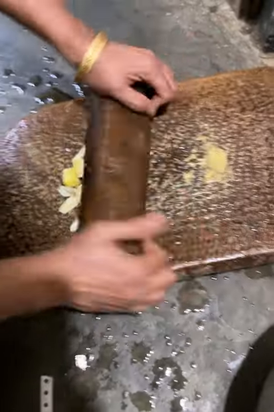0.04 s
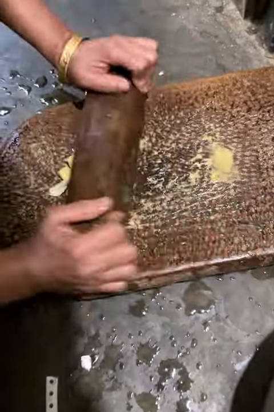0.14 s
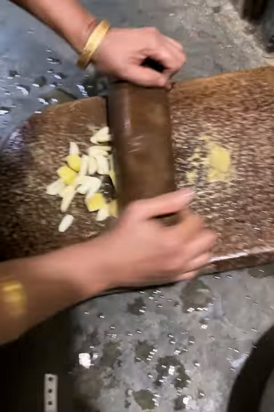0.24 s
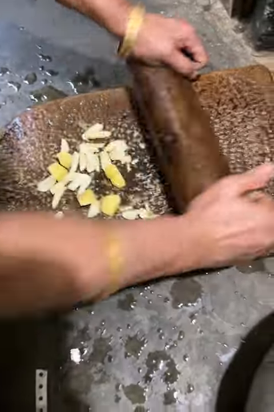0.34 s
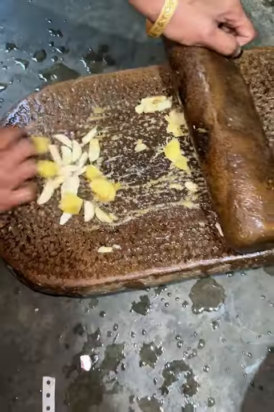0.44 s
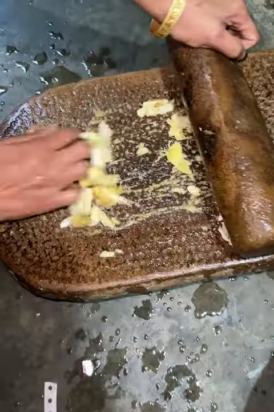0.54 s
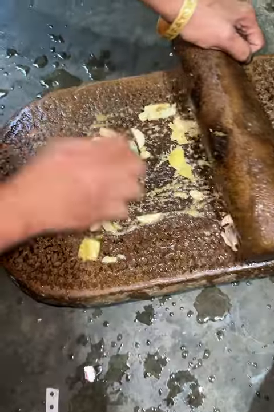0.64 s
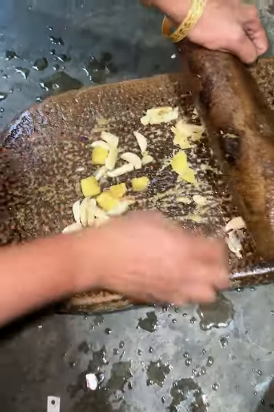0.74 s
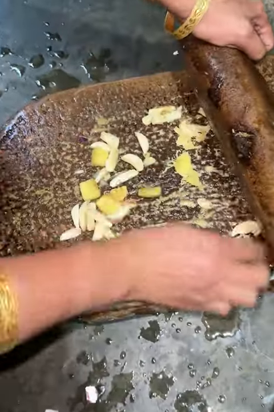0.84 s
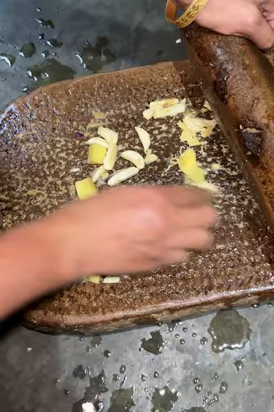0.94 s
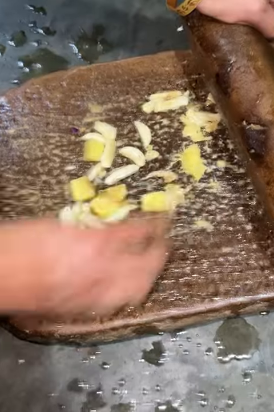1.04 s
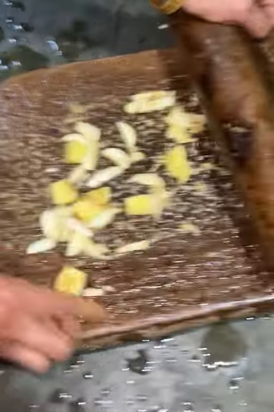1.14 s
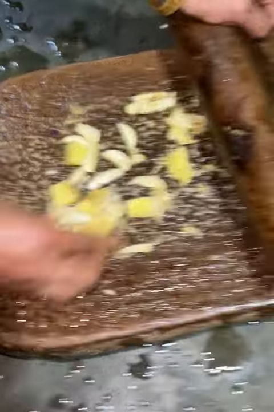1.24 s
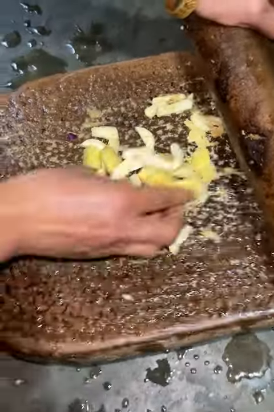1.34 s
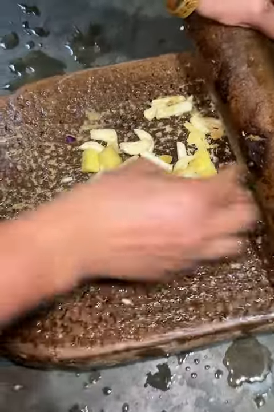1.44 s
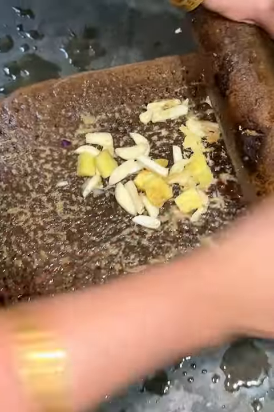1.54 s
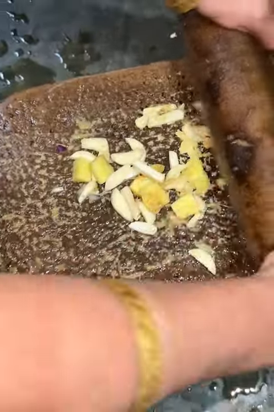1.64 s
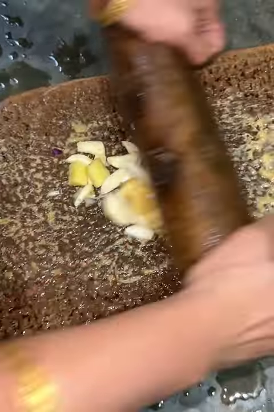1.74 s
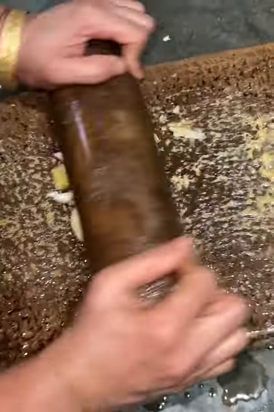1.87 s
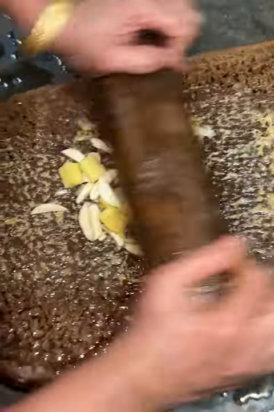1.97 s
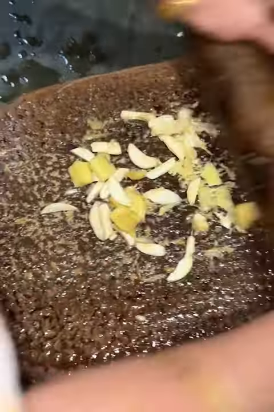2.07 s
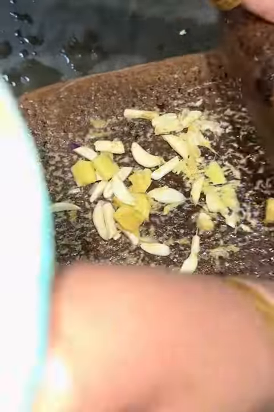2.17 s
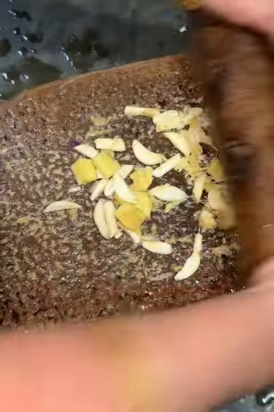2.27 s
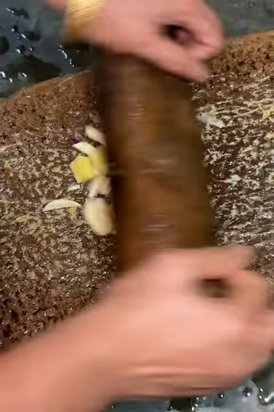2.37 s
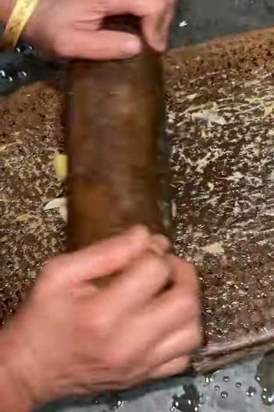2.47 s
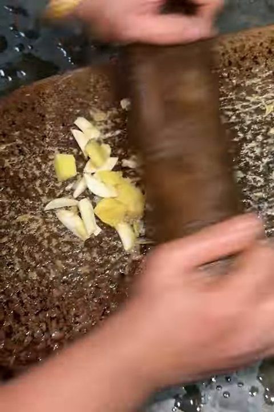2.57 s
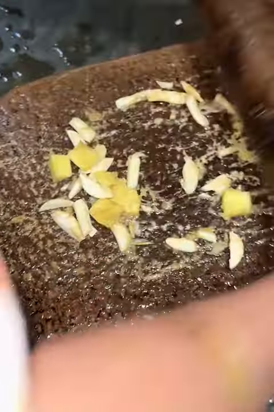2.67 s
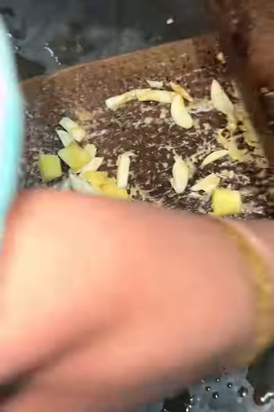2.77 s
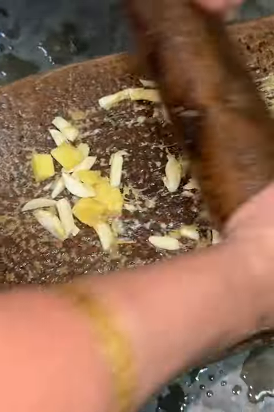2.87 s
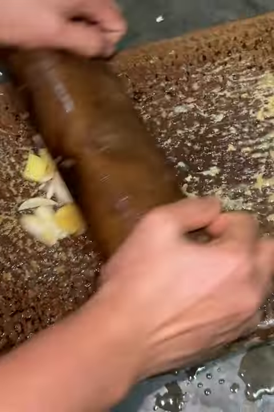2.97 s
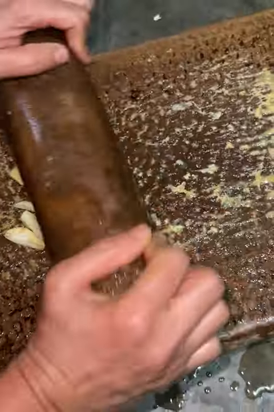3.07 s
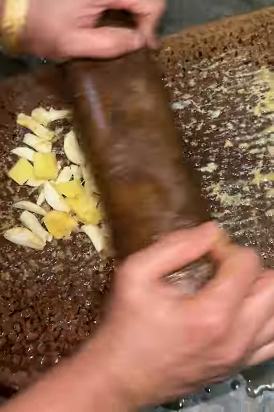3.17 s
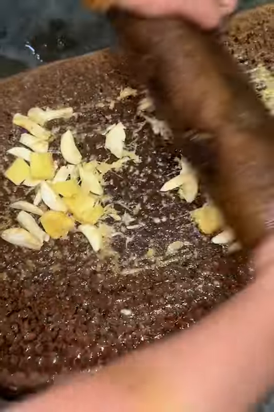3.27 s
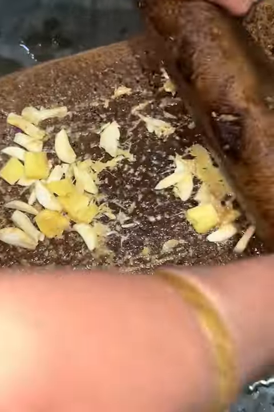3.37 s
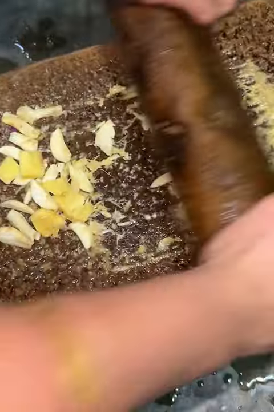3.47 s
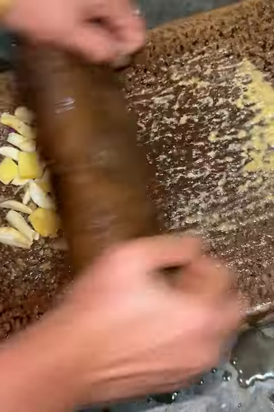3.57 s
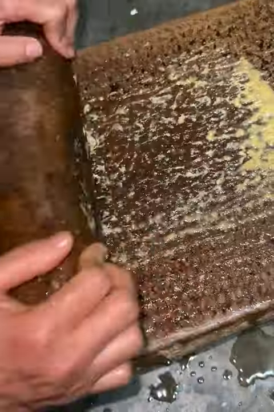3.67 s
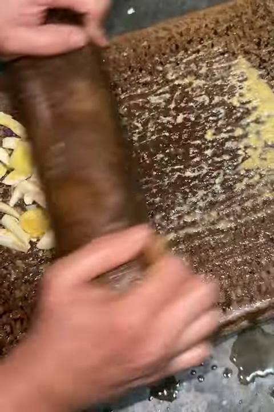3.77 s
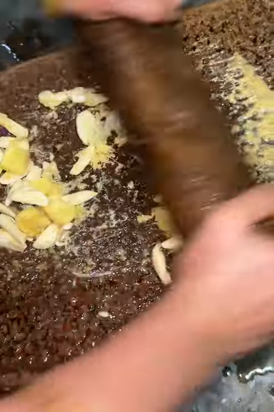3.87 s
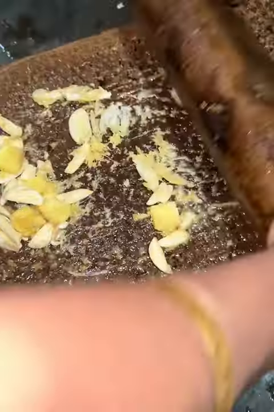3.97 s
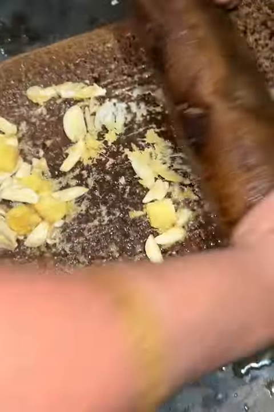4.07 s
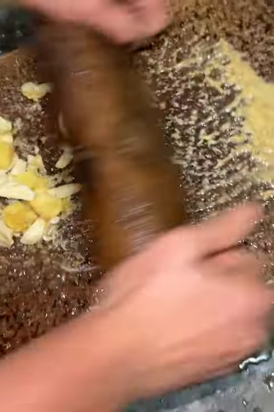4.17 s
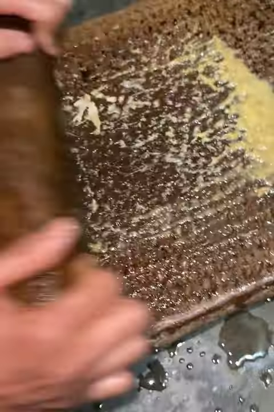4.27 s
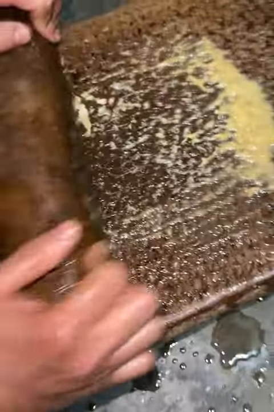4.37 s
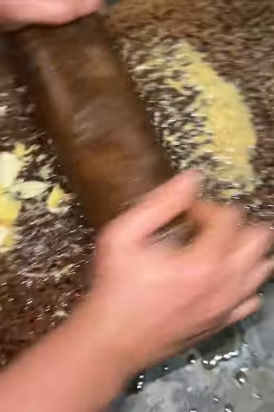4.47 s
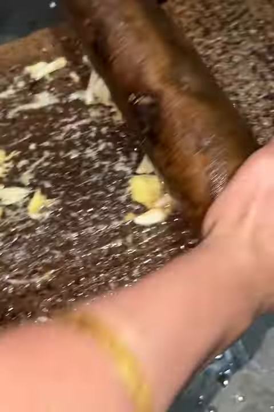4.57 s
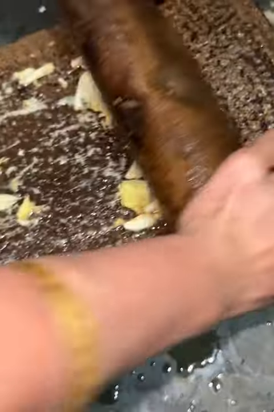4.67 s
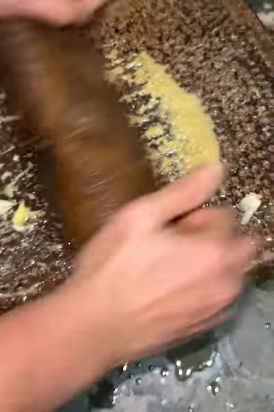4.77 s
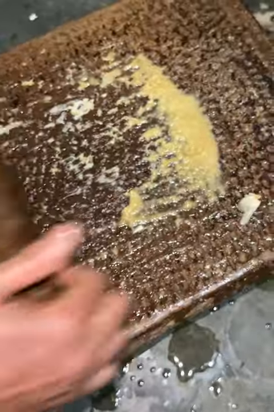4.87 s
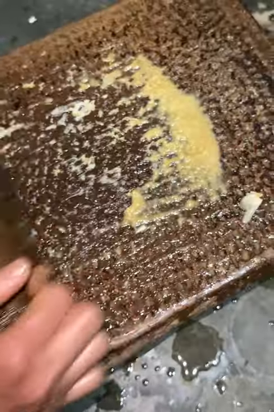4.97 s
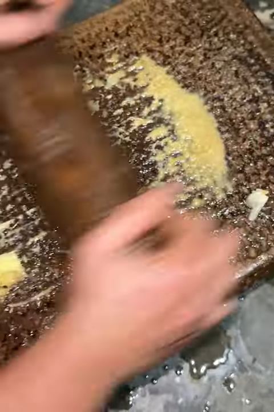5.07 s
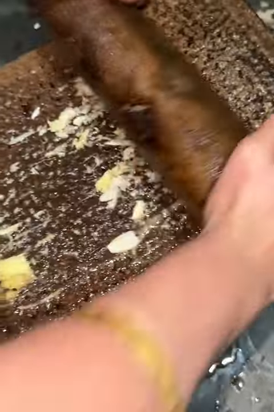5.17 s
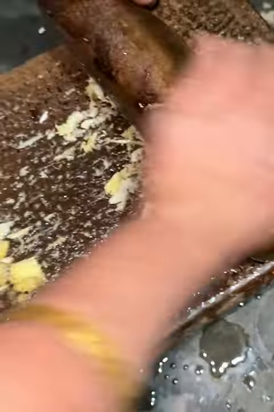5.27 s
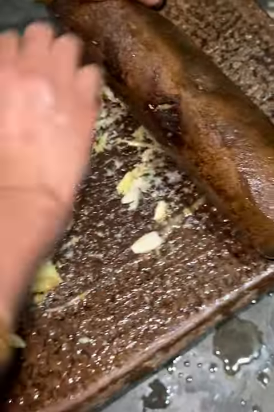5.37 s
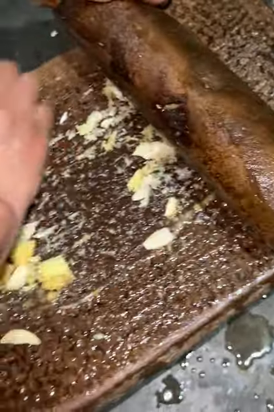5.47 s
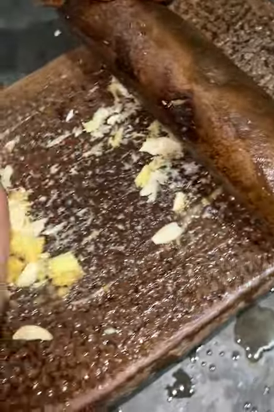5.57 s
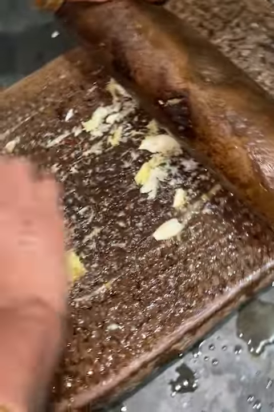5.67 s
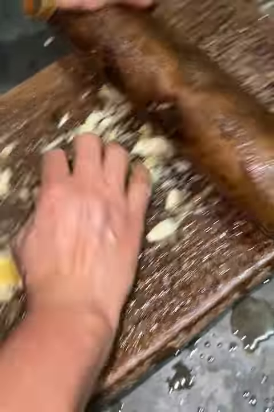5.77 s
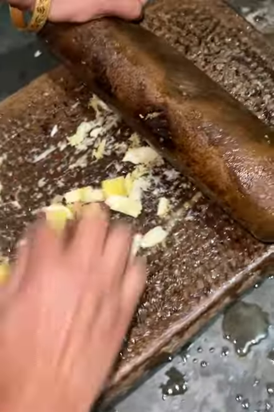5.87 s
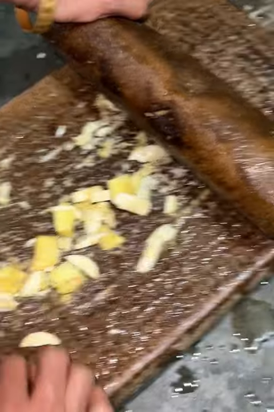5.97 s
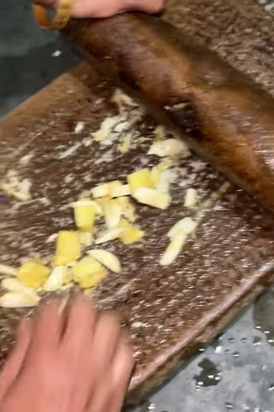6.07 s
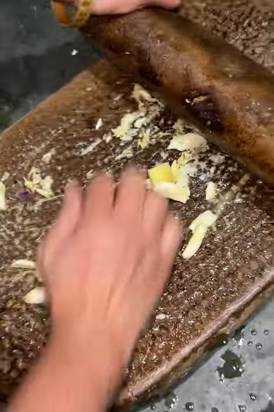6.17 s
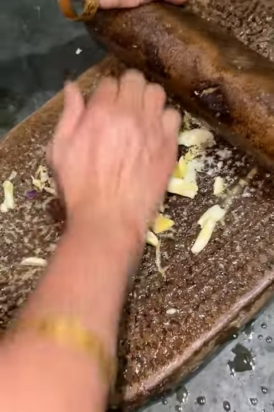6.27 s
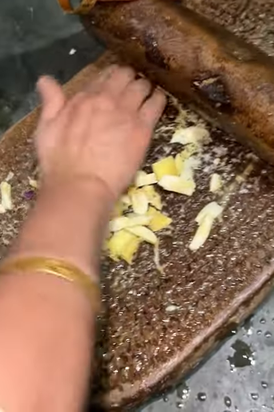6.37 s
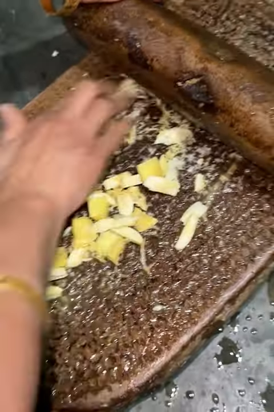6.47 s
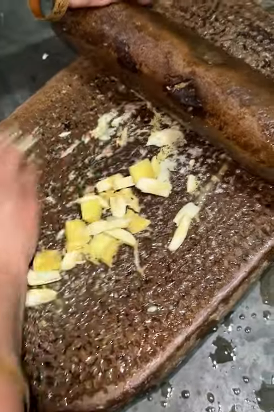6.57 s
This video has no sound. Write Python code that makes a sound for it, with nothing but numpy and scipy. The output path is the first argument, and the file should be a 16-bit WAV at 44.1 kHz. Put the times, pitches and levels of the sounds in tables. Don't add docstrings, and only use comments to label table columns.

```python
import sys
import numpy as np
from scipy import signal
from scipy.fft import rfft, irfft, next_fast_len
from scipy.io import wavfile
from scipy.ndimage import uniform_filter1d, map_coordinates

SR = 44100
rng = np.random.default_rng(int(sys.argv[2]) if len(sys.argv) > 2 else 0)


def volts(x):
    e = np.asarray(x, float) / 20
    return 10 ** e


def transcribe(signal):
    frames = np.atleast_2d(signal).T
    limited = np.clip(frames, -1, 1)
    pcm = np.round(limited * 32767).astype(np.int16)
    wavfile.write(sys.argv[1], SR, pcm)


N = 291942

# frequency in Hz, level in dB, t60 in seconds
SLAB = [(440, -26, .03), (490, 1, .085), (545, -2, .05), (600, -1, .05), (652, -2, .06), (692, -3, .065),
        (742, -10, .045), (830, -17, .03)]
# frequency in Hz, level in dB, t60 in seconds
ROCKING = [(159, -12, 0.12), (233, -2, 0.1), (282.4, 1.5, 0.098), (366, 0, 0.075)]
# frequency in Hz, level in dB, t60 in seconds
ROLLER = [(1144, -14, 0.018), (1260, -11.5, 0.03), (1415, 2, 0.032), (1533, -1, 0.02), (1695, -1, 0.018),
          (1878, -3.5, 0.028), (2120, -2.5, 0.03), (2477, -4, 0.025), (2760, -8, 0.021), (3350, -11, 0.012)]
# frequency in Hz, level in dB, t60 in seconds
FLOOR = [(115.2, 0.5, 0.13), (119.6, 3.5, 0.2)]
SCENE_CHANGE_S = 0.4


def unit(x):
    return x / np.sqrt(np.mean(x ** 2) + 1e-20)


def along(points, hz):
    f, v = np.transpose(points)
    return np.interp(np.log(hz + 1), np.log(f + 1), v)


def filtered(x, response):
    m = next_fast_len(x.shape[-1] + 8192)
    spectrum = rfft(x, m) * response(np.fft.rfftfreq(m, 1 / SR))
    return irfft(spectrum, m)[..., :x.shape[-1]]


def add(track, s, sound):
    part = track[..., round(s * SR):][..., :sound.shape[-1]]
    part += sound[..., :part.shape[-1]]


def wobble(rate):
    return map_coordinates(rng.standard_normal(400), [np.arange(N) * rate / SR])


def patchy(spectrum, patchy_db, hz_bins, frames):
    z = signal.stft(rng.standard_normal(N), nperseg=256)[2]
    field = uniform_filter1d(rng.standard_normal(z.shape), hz_bins, 0)
    field = uniform_filter1d(field, frames, 1)
    x = signal.istft(z * volts(patchy_db * unit(field)), nperseg=256)[1][:N]
    return unit(filtered(x, lambda hz: volts(along([(13, -90)] + spectrum, hz))))


def resonant(modes, widen):
    def response(f):
        total = 0
        for k, (centre, db, t60) in enumerate(modes):
            damping = 1j * f * widen / t60
            total = total + (-1) ** k * volts(db) * damping / (centre * centre - f * f + damping)
        return total
    return response


def ring(modes, t, stretch, scatter_db, detune, favour_hz=None):
    hz, db, t60 = np.transpose(modes)[..., None]
    strength, pitch = rng.standard_normal((2, len(modes), 1))
    if favour_hz:
        db = db - 105 * np.log2(hz / favour_hz) ** 2
    decay = volts(db + scatter_db * strength - 60 * t / (t60 * stretch))
    x = (decay * np.sin(2 * np.pi * hz * (1 + detune * pitch) * t)).sum(0)
    return x / np.abs(x).max()


def knocks():
    track, t = np.zeros(N), np.arange(SR // 4) / SR
    touch = 1 - np.exp(-t / .0004)
    cushion = (1 - np.exp(-t / 0.0013)) ** 2
    choke = 0.7 + 0.3 * np.exp(-(t / 0.0041) ** 2)
    swell = (1 - np.exp(-t / 0.021)) ** 2
    for s, db, edge_db, weight_db, hz in contacts():
        soft_db = 2 * max(5 - edge_db, 0)
        dulled = [(c, g - soft_db * max(np.log2(c / 1700), 0), t60) for c, g, t60 in ROLLER]
        roller = ring(dulled, t, .42, scatter_db=1.5, detune=.025)
        crack = 0.026 * volts(-soft_db - 60 * t / 0.03) * rng.standard_normal(len(t))
        edge = volts(db + edge_db + 12.5) * (touch * roller + crack)

        body = 2.6 * cushion * choke * ring(SLAB, t, 1, scatter_db=1.5, detune=.01, favour_hz=hz)
        thud_db = -8 + 0.68 * weight_db
        thud = volts(thud_db + 10.0) * cushion * ring(ROCKING, t, 0.96, scatter_db=5.5, detune=0.051)
        blow = volts(db) * (body + thud)
        boom = volts(db + weight_db + 7.0) * swell * ring(FLOOR, t, 0.93, scatter_db=2.5, detune=0.054)
        add(track, s, blow + edge + boom)
        add(track, s, echoes(volts(-9) * blow[:SR // 8] + volts(-11.5) * edge[:SR // 8]))

    def bending(hz):
        periods = 1.9
        late = np.exp(-2j * np.pi * periods * (np.log(1 + hz / 150) - hz / 1300))
        return late / (1 + (55 / (hz + 1)) ** 4)
    return filtered(track, bending)


def contacts():
    # start in seconds, peak
    # in dB, hard edge in dB, weight in dB, favoured pitch in Hz
    impacts = [(0.098, -34, -22, 18.5, 530), (0.227, -4.5, -14.5, -22, 536), (1.626, -22, -19, 7, 510),
               (1.653, -12, -16, -10, 542), (1.736, -11.5, -8.5, -4, 572), (2.019, -5, 3, 0, 560),
               (2.046, 3, -39, -12, 560), (2.253, -17, -13, 3, 560), (2.517, 5.5, -24.5, -30, 568),
               (2.649, -5.5, 6, -3.5, 690), (2.681, 0.5, -35, -20.5, 560), (2.941, -1.5, -9.5, -8, 640),
               (3.031, -6.5, -11, -32, 726), (3.113, 0, -52, -5.5, 529), (3.237, 0.5, -16, -24, 570),
               (3.277, 3.5, -12.5, -15, 612), (3.462, -21, -4, -8, 644), (3.731, 5.5, -27, -9.5, 595),
               (3.858, 4.5, -12, -28, 582), (4.187, -12.5, -6, -8, 590), (4.352, 6, -29, -10, 556),
               (4.546, -2.5, 2.5, -8.5, 560), (4.979, -17, -38, 7, 417),
               (1.666, -17, -27, -15, 600), (1.68, -23, -9, -10, 560), (2.025, -8.5, -25, -23, 740),
                (2.057, -8.5, -31, 0.5, 520), (2.096, -22, -25, 0, 637), (2.541, -2.5, -44, -10, 480),
                (2.568, -25, -38, -17, 480), (2.732, -24, -23, 17, 500), (3.084, -32, -30, -4, 440),
                (3.125, -32, -40, -4, 504), (3.261, -10, -29, -29, 590), (3.29, -10, -22, -5, 624),
                (3.303, -15, -34, -15, 690), (3.744, -7, -35, -21, 600), (3.763, -7.5, -35, -26, 710),
                (3.866, -12, -20, -30, 480), (4.206, -33, 5, 1, 654), (4.219, -17.5, -4, -15, 660),
                (4.364, 1, -35, -24, 600), (4.558, -20, -12, -16, 500), (4.606, -12, -29, -19, 690),
                (5.166, -24, -25, -13, 480)]
    # start in seconds, peak in dB, hard edge in dB,
    # weight in dB
    further = [(0.279, -13.5, -16, -30), (0.31, -16.5, -13.5, -7), (1.697, -18, -19, -1),
               (1.755, -18.5, -4, -2), (1.858, -28, -8, -6), (2.071, -14, -19, 3), (2.531, -0.5, -39, -11),
               (2.555, -6, -45, -6.5), (2.705, -8.5, -30, 0), (2.869, -22, -30, -1),
               (2.885, -15.5, -18, -5), (2.915, -4.5, -19.5, -24), (2.955, -7, -14, -22),
               (3.055, -15, -27, -9), (3.312, -16, -25, -2), (3.756, -6, -19, -6.5),
               (3.889, -16.5, -6, -25), (3.921, -11, -16, -27), (4.212, -22.5, 5.5, -19),
               (4.378, -5.5, -18, 2.5), (4.584, -10.5, -20, -5.5), (5.159, -20, -15, -4),
               (5.205, -26.5, -20, -20), (0.254, -17, -15, -5), (0.338, -27, -16, -15),
               (2.934, -7.5, -13, -18), (2.967, -11, -15, -8), (4.597, -34, -27, 12), (4.841, -43, -30, 21),
               (2.904, -18, -21, 12)]
    favoured_hz = 560
    return impacts + [row + (favoured_hz,) for row in further]


def echoes(sound):
    # frequency in Hz, t60 in seconds
    room = [(100, 1), (300, 0.18), (600, 0.27), (1500, 0.32), (4000, 0.17)]
    hz, t, z = signal.stft(rng.standard_normal(SR // 2), SR, nperseg=512)
    tail = signal.istft(z * volts(-60 * t / along(room, hz)[:, None]), SR, nperseg=512)[1]
    tail = np.pad(tail, (280, 0)) / np.linalg.norm(tail)
    return signal.fftconvolve(sound, tail)


def grinding():
    # start in seconds, run-up in seconds, hold in seconds,
    # scrape hiss in dB, drumming on the pits in dB
    strokes = [(0.171, 0.059, 0.019, -28.5, -50), (1.63, 0.13, 0.014, -33.5, -31.5),
               (1.91, .11, 0.036, -25, -40.5), (2.116, .01, 0.018, -38, -45),
               (2.268, 0.046, 0.13, -35, -44.5), (2.476, 0.016, 0.16, -34, -46),
               (2.815, 0.11, 0.038, -34.5, -23), (3.05, 0.052, 0.14, -30.5, -58),
               (3.456, 0.024, 0.21, -40.5, -53), (3.703, 0.017, 0.16, -33, -45),
               (3.993, 0.01, 0.0076, -43, -52), (4.111, 0.098, 0.024, -34, -34.5),
               (4.309, 0.021, 0.2, -31.5, -43), (4.721, 0.05, 0.12, -34.5, -49.5),
               (4.953, 0.036, .15, -32, -40), (5.966, 0.027, 0.096, -46, -64)]
    # time in seconds, level in dB
    brushing = [(0, -41), (.45, -42), (.7, -45), (1, -44.5), (1.3, -42), (1.6, -45.5), (2.2, -46),
                (3.6, -45.5), (4.05, -44), (4.7, -45.5), (5.4, -48), (5.9, -50), (6.3, -47.5),
                (6.62, -45.5)]
    # frequency in Hz, level in dB per Hz
    scrape = [(600, -40), (1500, -6), (2300, -5), (3200, -2), (4500, -2), (6000, -1), (7500, 0), (9000, -2),
              (11000, -2), (12500, -5), (14000, -6), (15500, -9)]
    run_up_db, stop_db_per_s = 17, 250
    t = np.arange(N) / SR
    s, run_up, hold, hiss_db, drum_db = np.transpose(strokes)[..., None]
    top = s + run_up
    swell_db = run_up_db * np.maximum((top - t) / (run_up + .002), 0)
    fade_db = stop_db_per_s * np.maximum(t - top - hold, 0)
    shape = volts(-swell_db - fade_db)
    hands = volts(np.interp(t, *np.transpose(brushing)) + 1.2 * wobble(6.1))

    chatter_db, chatter_t60 = -24.5, 0.55
    rattle, after = np.zeros(N), t[:SR // 2]
    for start, db, *_ in contacts():
        audible = (start > SCENE_CHANGE_S) | (start + after < SCENE_CHANGE_S)
        add(rattle, start, volts(db + chatter_db - 60 * after / chatter_t60) ** 2 * audible)
    drum = np.sqrt(((volts(drum_db) * shape) ** 2).sum(0) + rattle)
    press = ((volts(hiss_db) * shape) ** 2).sum(0)
    slide = np.sqrt(press * volts(2.8 * wobble(30)) + hands ** 2)

    grain_size = volts(np.minimum(0.5 * rng.exponential(size=N), 18))
    grains = rng.standard_normal(N) * grain_size * (rng.random(N) < .08)
    gritty = unit(filtered(grains, lambda hz: volts(along(scrape, hz))))
    hiss = patchy(scrape, 3.35, hz_bins=5, frames=8) + .5 * gritty

    pit_depth = volts(np.minimum(3 * rng.exponential(size=N), 10))
    pits = rng.standard_normal(N) * pit_depth * (rng.random(N) < .015)
    faint_roller = [(c, db - 27.0, t60) for c, db, t60 in ROLLER]
    rumble = unit(filtered(pits, resonant(ROCKING + SLAB + faint_roller, widen=4.06)))
    boom = unit(filtered(rng.standard_normal(N), resonant(FLOOR, widen=9.8)))
    boom_level = volts(-7.5) * drum + volts(-16.5) * np.sqrt(press) + volts(-52)
    return (volts(-1.0) * slide * hiss + (drum + volts(-8) * hands) * rumble
            + boom_level * volts(2.5 * wobble(10)) * boom)


def bangle():
    # start in seconds, peak in dB
    clinks = [
        (2.115, -5.5),
    ]
    # frequency in Hz, level in dB, t60 in seconds
    metal = [(3273, -16, .3), (4759, -9, .22), (6767, -5, .15), (8597, 0, .2), (10920, 3, .17),
             (13497, 7, .12)]
    track, t = np.zeros(N), np.arange(SR // 4) / SR
    for s, db in clinks:
        bright = resonant([(4000, 4.6, 1), (12000, 4.9, 0.9)], widen=1100)
        snap = unit(filtered(rng.standard_normal(len(t)), bright))
        tick = 0.38 * volts(-60 * t / 0.013) * snap
        add(track, s, volts(db) * (ring(metal, t, 0.85, scatter_db=0.5, detune=0) + tick))
    return track


def squelches():
    # start in seconds, peak in dB, pocket pitch in Hz, length in seconds
    squeezes = [(0.186, -34.5, 2960, 0.021), (0.432, -39, 2580, 0.088), (0.489, -37, 3820, 0.037),
                (0.509, -37, 2090, 0.017), (0.602, -39.5, 2830, 0.07), (0.679, -40, 1540, 0.029),
                (0.717, -44, 1245, 0.088), (1.06, -41, 1490, 0.059), (1.082, -41, 1530, 0.085),
                (1.172, -39, 3370, 0.042), (1.254, -38, 3900, 0.042), (1.57, -38.5, 3340, 0.015),
                (1.587, -41, 1530, 0.099), (1.673, -40, 1560, 0.025), (1.93, -39, 3050, 0.085),
                (2.342, -38, 3320, 0.066), (3.19, -41, 3900, 0.098), (3.603, -32, 3540, 0.032),
                (3.651, -40.5, 3280, 0.081), (4.045, -44, 3370, 0.045), (4.151, -36.5, 3740, 0.053),
                (4.902, -37, 2700, 0.073), (5.064, -48, 3850, 0.026), (5.33, -44.5, 4130, 0.041),
                (5.459, -41.5, 2120, 0.013), (5.758, -40.5, 2970, 0.031), (5.763, -52, 1900, 0.013),
                (5.81, -45, 3770, 0.022), (5.857, -43, 4660, 0.058), (6.548, -47, 3100, 0.072),
                (6.34, -41, 3080, 0.054), (6.384, -38.5, 3300, 0.041), (6.441, -43, 3420, 0.028)]
    track, t = np.zeros(N), np.arange(SR // 4) / SR
    for s, db, hz, length in squeezes:
        width_hz = 110 * (hz / 1500) ** 2
        pops = rng.standard_normal(len(t)) * (0.31 + (rng.random(len(t)) < .02) * 2.4)
        pocket = unit(filtered(pops, resonant([(hz, 0, 1)], widen=width_hz)))
        u = t / max(length, .005) * 3
        add(track, s - .005, volts(db - 2.0) * u * np.exp(1 - u) * pocket)
    return track


def cracking_grit():
    # start in seconds, peak in dB, pitch in Hz
    cracks = [(0.182, -14, 5600), (0.233, -9, 6400), (0.3355, -22, 6340), (1.5424, -18, 6500),
              (1.672, -19, 6700), (1.732, -28, 6940), (1.9345, -36, 7980), (2.0066, 0.5, 6000),
              (2.0145, -2, 4020), (2.044, -16, 5600), (2.114, 7.5, 9400), (2.3042, -25, 7470),
              (2.3675, -23, 6300), (2.4897, -38, 5700), (2.5124, -10, 6600), (2.5311, -29, 7400),
              (2.6479, -35, 6490), (2.9257, -38, 6090), (3.1103, -33, 7780), (3.2186, -18, 6610),
              (3.4765, -34, 7000), (3.6616, -30, 7400), (3.7316, -20, 6050), (4, -8.5, 7470),
              (4.155, -13, 6370), (4.197, -10.5, 7600), (4.3016, -39, 7490), (4.3365, -27, 7810),
              (4.474, -10, 5870), (4.745, -18, 6230), (4.796, -13, 6000), (4.9705, -17, 7200)]
    track, t = np.zeros(N), np.arange(400) / SR
    for s, db, hz in cracks:
        chip = unit(filtered(rng.standard_normal(400), resonant([(hz * 1.26, 0, .001)], widen=3.9)))
        add(track, s, volts(db - 17 - 60 * t / 0.036) * chip)
    return track


def scuff():
    # frequency in Hz, level in dB per Hz
    skin = [(250, -36), (550, -1.5), (800, -4), (1300, -6.5), (1800, -15), (16000, -87)]
    start_s, rise_s, level_db = 5.98, 0.041, -41.5
    u = np.maximum(np.arange(N) / SR - start_s, 0) / rise_s
    return volts(level_db) * u ** 0.63 * np.exp(1 - u) * patchy(skin, 2.1, hz_bins=2, frames=4)


def thumps():
    # start in seconds, peak in dB
    shifts = [
        (0.935, -29),
        (1.002, -35),
        (1.076, -39),
        (4.161, -36),
        (5.71, -52),
        (5.94, -46),
    ]
    track, t = np.zeros(N), np.arange(SR // 4) / SR
    for s, db in shifts:
        swing = (1 - np.exp(-t / .01)) ** 2 * ring(FLOOR, t, .55, scatter_db=.6, detune=.03)
        add(track, s, volts(db) * unit(swing) * .2)
    return track


def kitchen_air():
    # frequency in Hz, level in dB per Hz
    background = [(40, 8.5), (60, 7.5), (110, 4.5), (200, -10), (450, -6.5), (800, -9.5), (1500, -11),
                  (3000, -10.5), (5000, -18), (8500, -25), (15500, -48)]
    return volts(-46) * patchy(background, 4.9, hz_bins=4, frames=12)


def ports(x):
    # frequency in Hz, phase by which right leads in radians
    right_lead = [(200, -.05), (860, -.3), (1500, -.08), (2000, 0), (5400, 0), (5700, .6), (8000, 1.65),
                  (10000, 2.3), (10950, 2.75), (11200, np.pi), (13250, np.pi), (13500, 3.55), (15600, 4.6)]
    # frequency in Hz, left over right in dB
    left_tilt = [(100, .1), (900, 2.2), (1900, 0)]
    # frequency in Hz, unshared sound in dB
    unshared = [(60, -50), (350, -19), (900, -11), (1500, -19), (1900, -60), (5400, -60), (5800, -18),
                (15000, -16)]
    # frequency in Hz, unshared sound in dB
    early_width = [(1800, -60), (2100, -5), (5200, -4), (5600, -60)]
    hz, t, z = signal.stft(x, SR, nperseg=512)
    turns = np.exp(2j * np.pi * rng.random(z.shape))
    share = volts(along(unshared, hz))[:, None] + volts(along(early_width, hz))[:, None] * (t < 1.03)
    other = signal.istft(z * turns * share * 1.6, SR, nperseg=512)[1][:N]
    sign = np.array([[1], [-1]])

    def port(f):
        return volts(sign * along(left_tilt, f) / 2) * np.exp(-.5j * sign * along(right_lead, f))
    return filtered(np.array([x, x]), port) + sign * other


def scene():
    t = np.arange(N) / SR
    dip = np.interp(t, [.385, .4, .403, .44], [1.0, 0.016, 0.019, 0.99])
    heard = np.where((t > SCENE_CHANGE_S) & (t < .9), 0, 1)
    stone = knocks() * heard + grinding()
    details = bangle() + squelches() + cracking_grit() + scuff()
    return ports((stone + details + thumps() + kitchen_air()) * dip)


def top_cut(x):
    return signal.sosfilt(signal.butter(12, 16090, fs=SR, output="sos"), x)


def record(dry):
    limited = filtered(dry, lambda hz: hz < 15850)
    clipped = np.clip(limited, -1.03, 1.03)
    return top_cut(clipped)


dry = scene()
out = record(dry)
transcribe(out)
```